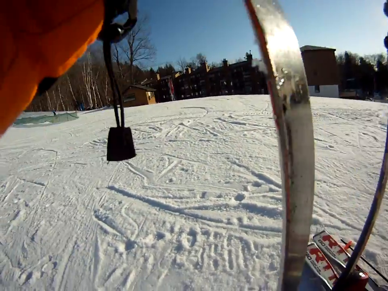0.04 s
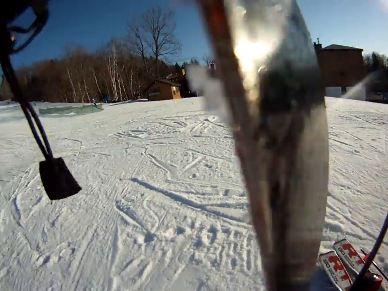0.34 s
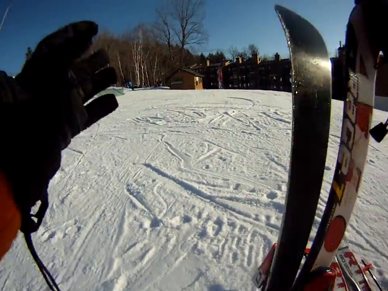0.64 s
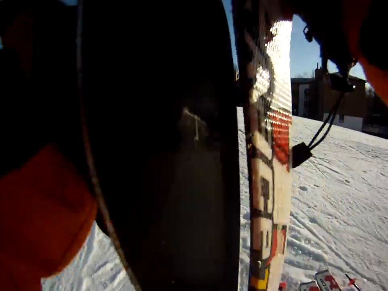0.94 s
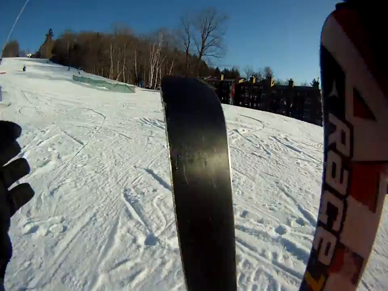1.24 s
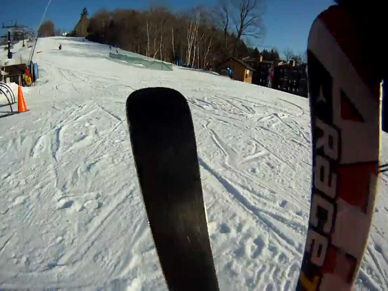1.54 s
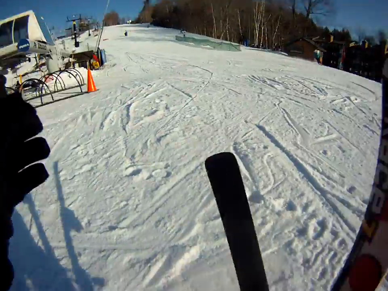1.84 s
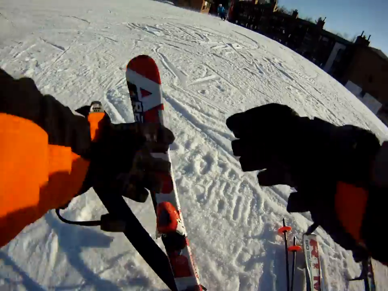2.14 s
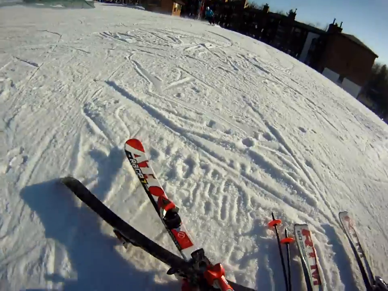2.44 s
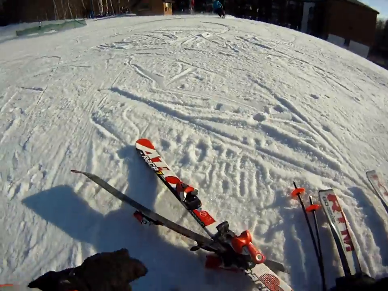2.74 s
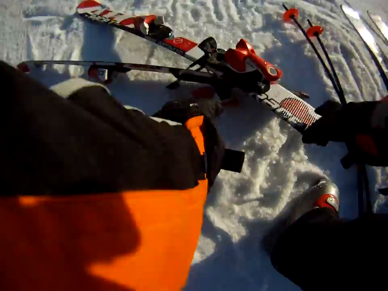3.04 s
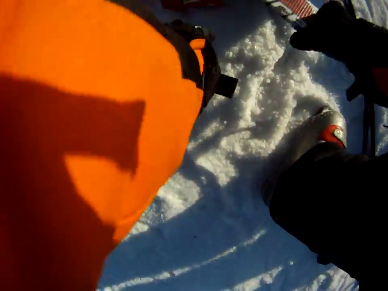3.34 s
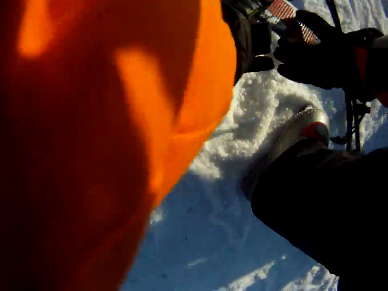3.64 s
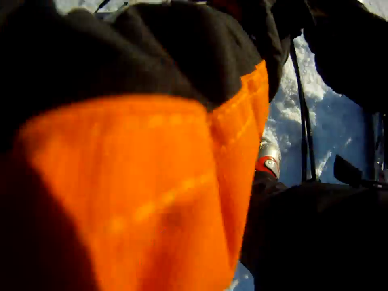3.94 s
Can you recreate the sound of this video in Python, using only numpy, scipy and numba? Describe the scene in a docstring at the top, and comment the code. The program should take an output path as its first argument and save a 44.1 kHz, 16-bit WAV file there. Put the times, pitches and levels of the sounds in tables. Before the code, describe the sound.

Skis clack together sharply up close, with edge scrapes, jacket rustle and light wind.

```python
"""Skis knocked together.

Close to a body-worn microphone, two skis are pulled apart, knocked together and dropped.
Steel edges scrape, bindings rattle, a jacket rustles and crunches; light wind and a low
machine hum lie underneath. Each hard clack overloads the input: the gain ducks, then recovers."""
import sys
import numpy as np
from scipy import signal
from scipy.fft import rfft, irfft, next_fast_len
from scipy.io import wavfile
from scipy.ndimage import map_coordinates
from numba import njit

SR = 44100
rng = np.random.default_rng(int(sys.argv[2]) if len(sys.argv) > 2 else 0)


def pcm_store(signal):
    """Save signal as 16-bit PCM."""
    levels = np.round(np.clip(np.atleast_2d(signal), -1, 1) * 32767)
    wavfile.write(sys.argv[1], SR, levels.astype(np.int16).T)


N = 4 * SR

# nylon sleeve swishing past; jacket body crumpling (t/s, level/dB)
SLEEVE_LEVELS = [(0, -32), (.08, -33), (.13, -37), (.19, -39.5), (.36, -42.5), (.6, -34.5), (.73, -43),
                 (.83, -36), (.94, -41), (1.01, -33.5), (1.13, -31.5), (1.24, -33.5), (1.38, -44.5),
                 (1.47, -30.5), (1.74, -42), (1.9, -40), (2.4, -53), (4, -40.5)]
CRUMPLE_LEVELS = [(0, -45), (.55, -37.5), (.75, -44), (.95, -32), (1.02, -40), (1.15, -33), (1.3, -45),
                  (1.4, -41), (1.55, -34.5), (1.72, -36), (1.84, -32.5), (1.97, -26.5), (2.1, -35),
                  (2.42, -36.5), (2.77, -36.5), (2.89, -28), (3.08, -24.5), (3.29, -40), (3.5, -33),
                  (3.72, -35.5), (3.88, -31.5), (4, -33.5)]
# low noise on the case (t/s, wind/dB, mount rub/dB)
RUMBLE_LEVELS = [(0, -34.5, -33), (.3, -30, -32.5), (.55, -35.5, -31), (.78, -34, -31.5),
                 (.97, -27.5, -31.5), (1.1, -32.5, -31), (1.35, -31.5, -32.5), (1.7, -30.5, -30),
                 (2, -32, -30), (2.4, -34, -36), (2.75, -32, -31), (3.12, -25, -30.5), (3.4, -31, -27),
                 (3.58, -31.5, -31), (3.72, -30.5, -27.5), (4, -28, -32.5)]
# machine hum (t/s, fundamental/dB, third harmonic/dB)
HUM_LEVELS = [(0, -31, -34), (.3, -34.5, -31.5), (.8, -34, -32.5), (1.3, -31.5, -37), (1.9, -37, -34),
              (2.4, -32, -32), (2.7, -27, -30.5), (3, -27.5, -29.5), (3.3, -35.5, -29), (3.55, -55, -29.5),
              (3.8, -31.5, -28.5), (4, -35, -29)]
# edge sliding on edge (t/s, length/s, level/dB, squeal over hiss/dB)
EDGE_STROKES = [(0.2, 0.08, -31.5, -3), (0.287, 0.025, -25, -5), (0.4, 0.04, -30.5, -13),
                (0.463, .018, -27.5, -6), (0.486, 0.013, -19, 7), (.5, 0.027, -23, 0),
                (0.537, 0.076, -31.5, -5), (0.828, 0.075, -32, -20), (0.922, 0.05, -27.5, -14),
                (1.051, .03, -29.5, -10), (1.311, 0.0036, -25.5, 6), (1.318, .008, -12.5, 6),
                (1.36, 0.039, -31, -3), (1.543, 0.013, -33.5, -2), (1.563, 0.019, -18.5, -9),
                (1.589, 0.012, -13, -5), (1.634, .012, -18, -14), (1.646, 0.022, -17, -24)]
# resonances of a sliding edge (f/Hz, width/Hz, level/dB)
SQUEAL_MODES = [(3100, 230, -1.5), (3540, 180, 1), (4880, 200, 2.5), (6970, 320, -4), (8700, 83, -7.5)]
# taps and rattles (t/s, level/dB, t60/s, hardness: 0 plastic binding to 1 steel edge)
TAP_HITS = [(.211, -17.5, 0.011, .9), (.217, -15.5, 0.011, 1), (.227, -21, .02, 0.82),
            (.237, -15.5, 0.015, 0.96), (0.255, -14.5, 0.0088, 0.96), (0.416, -17, 0.045, 0.84),
            (0.428, -10.5, 0.021, 0.95), (0.486, -17, 0.038, 1), (.576, -20.5, 0.054, .4),
            (0.595, -16, 0.017, 0.98), (0.94, -14, 0.02, 0.35), (0.973, -14, 0.022, 1),
            (1.049, -10.5, 0.02, 0.76), (1.130, -18, 0.12, 0.92), (1.216, -8, .03, 0.91),
            (1.389, -20, .03, .8), (1.513, -19.5, 0.013, 1), (1.695, -17, 0.022, 0.21),
            (1.998, -8.5, 0.03, 0.17), (2.004, -37, 0.028, .1), (2.053, -16, 0.07, 0.34),
            (2.178, -13.5, 0.051, 0.13), (2.193, -10, 0.061, 0.061), (2.203, -15, 0.026, 0.13),
            (2.220, -6.5, 0.038, 0.55), (2.279, -12.5, 0.12, 0.23), (2.287, -6.5, 0.042, 0.18),
            (2.296, -13, .025, 0.1), (2.323, -10.5, 0.041, 0.058), (2.375, -20.5, .03, 0.27),
            (2.502, -14, 0.039, 0.35), (2.518, -12, 0.035, 0.76), (2.525, -16.5, 0.038, 0.39),
            (2.566, -18.5, 0.024, 0.26), (2.834, -19, .03, .3), (3.403, -22.5, 0.016, 0.17),
            (3.635, -21.5, 0.033, .05), (3.779, -22, 0.02, .1)]
# bumps of gloves, skis and boots (t/s, level/dB, t60/s, f/Hz)
THUD_HITS = [(.295, -16.5, 0.07, 104), (0.347, -18, 0.041, 477), (.945, -24, 0.072, 270),
             (.966, -17, 0.084, 144), (1.010, -16, 0.06, 440), (1.563, -21, 0.029, 480),
             (1.916, -18, 0.042, 584), (1.997, -11, 0.059, 283), (2.000, -13.5, 0.066, 513),
             (2.184, -16.5, 0.14, 416), (2.196, -15, 0.074, 722), (2.226, -15.5, 0.21, 422),
             (2.527, -13.5, 0.064, 407), (3.118, -11, 0.081, 410), (3.347, -16, 0.087, 476),
             (3.403, -13, 0.037, 438)]
# ski on ski (t/s, level/dB, contact/s, pitch ratio, flex mode boost/dB)
CLACK_HITS = [(1.1535, 13.5, 0.0046, 1, -3), (1.425, 11, 0.0049, .96, -3), (1.7728, 10.5, 0.0041, 1.04, 8),
              (2.0256, 11, 0.0033, 0.98, -2.5), (2.2385, 9.5, 0.0018, 1.0, -2),
              (2.2442, 14, 0.0026, .99, -10)]
# ringing of a ski (f/Hz, level/dB, t60/s)
RING_MODES = [(607, -18, 0.016), (847, -18.5, 0.014), (1158, -10.5, 0.019), (1748, -14, 0.018),
              (2133, -9, 0.019), (2426, -4.5, 0.021), (2781, 0, 0.017), (3153, -10, .014),
              (3863, -11, 0.014), (4383, -12.5, 0.011), (5053, -14.5, 0.0073), (7330, -19, 0.0079),
              (8510, -17.5, 0.0096), (9210, -10, 0.017), (14470, -12.5, .012)]
# jacket fabric crunching (t/s, width/s, level/dB)
JACKET_SWELLS = [(2.835, 0.009, -24.5), (2.95, 0.04, -38), (3.065, 0.017, -27.5), (3.204, 0.024, -30.5)]

# source spectra (f/Hz, relative level/dB)
SLEEVE_SPECTRUM = [(600, -22), (1400, -12.5), (2100, 0.5), (2650, 4.5), (3250, -1), (3650, 0.5),
                   (4300, -6.5), (5100, -9), (7000, -14), (8300, -7.5), (9500, -8.5), (10800, -19),
                   (13000, -16), (14700, -8), (15800, -23)]
CRUMPLE_SPECTRUM = [(380, -15), (650, -5), (950, -4), (1270, -1.5), (1650, -5), (2100, 0), (2600, -0.5),
                    (3050, -2), (3350, -11), (3800, -5.5), (5000, -13.5), (7000, -16), (8300, -14),
                    (8700, -16), (9400, -11.5), (11000, -10.5), (13000, -10.5), (14700, -11.5),
                    (15800, -45)]
WIND_SPECTRUM = [(12, -35), (22, -6), (32, -4.5), (50, 1.5), (90, -2), (150, 1.5), (230, -1), (330, -11.5),
                 (700, -39), (1500, -72)]
MOUNT_SPECTRUM = [(100, -19), (220, -12), (300, -0.5), (440, 1.5), (560, -1.5), (680, -10), (850, -19.5),
                  (1200, -23.5), (2500, -44), (5000, -80)]
HISS_SPECTRUM = [(700, -2), (2500, -3), (5000, -25), (9300, -18), (11000, 4), (11700, 24), (12400, 20),
                 (13100, -8), (14800, -8), (16000, -16)]
STEEL_SPECTRUM = [(500, -42), (1000, -23.5), (1650, -2), (1900, -11.5), (2400, 2.5), (3000, 2.5),
                  (4200, -1), (5100, -4), (7000, -8), (9000, -5), (10200, -16.5), (11200, -31),
                  (13200, -22), (14700, -7), (15800, -2.5)]
PLASTIC_SPECTRUM = [(350, 0), (650, -2), (950, -8.5), (1350, -2), (2000, -1.5), (2800, -0.5), (4000, -28.5),
                    (5000, -23), (7500, -40.5), (9500, -11), (11000, -12), (13000, -16), (14600, -13.5),
                    (15800, -32)]
THUD_SPECTRUM = [(40, -19), (130, 3.5), (270, -13), (430, 6.5), (600, -1), (900, -17), (1400, -13),
                 (2500, -26)]
# case notch at 6 kHz; top-octave colour of the electronics (f/Hz, gain/dB)
CASE_RESPONSE = [(5150, 0), (5600, -7), (6000, -15), (6500, -5.5), (6900, 0.5)]
TREBLE_RESPONSE = [(9600, 0), (10800, -11), (12000, -15), (13200, -10), (14200, -7.5), (14900, 2),
                   (15500, -19)]


def amp(db):
    """Decibels to gain."""
    return 10 ** (np.asarray(db) / 20)


def unit(x):
    """Scale to rms 1."""
    return x / np.sqrt(np.mean(x ** 2) + 1e-20)


def clock(n=N):
    """Sample times in s."""
    return np.arange(n) / SR


def curves(rows):
    """Each column after the time, interpolated per sample."""
    times_s, *columns = np.transpose(rows)
    return [np.interp(clock(), times_s, column) for column in columns]


def wobble(rate_hz):
    """Smooth random curve through unit-variance knots."""
    knots = rng.standard_normal(int(N * rate_hz / SR) + 4)
    return map_coordinates(knots, [clock() * rate_hz])


def filtered(x, response):
    """Apply a gain given as a function of f/Hz."""
    size = next_fast_len(N + SR // 4)
    return irfft(rfft(x, size) * response(np.fft.rfftfreq(size, 1 / SR)), size)[:N]


def shaped(x, points):
    """Apply (f/Hz, gain/dB) points, joined over log frequency."""
    points_hz, db = np.transpose(points)
    return filtered(x, lambda hz: amp(np.interp(np.log(hz + 1), np.log(points_hz + 1), db)))


def coloured(x, spectrum):
    """Shape x, then scale to rms 1."""
    return unit(shaped(x, spectrum))


def noise(spectrum):
    """Coloured noise, rms 1."""
    return coloured(rng.standard_normal(N), spectrum)


def slips(rate_hz, spread_db, smooth_db):
    """Uneven stick-slip impulses over smooth friction noise."""
    hits = rng.random(N) < rate_hz / SR
    sizes = rng.choice([-1, 1], N) * amp(spread_db * np.clip(rng.standard_normal(N), -2, 2))
    return unit(hits * sizes) + amp(smooth_db) * rng.standard_normal(N)


def strike(t, rise_s, hold_s, t60_s):
    """Envelope: rise, hold during contact, decay."""
    t = np.maximum(t, 0)
    decay_db = -60 * np.clip(t - hold_s, 0, 2 * t60_s) / t60_s
    return (1 - np.exp(-t / rise_s)) * amp(decay_db)


def fabric(levels, spectrum):
    """Stiff jacket fabric crinkles as the skier moves; folds snap at random."""
    t = clock(SR // 50)
    level_db, = curves(levels)
    crinkle = unit(slips(rate_hz=700, spread_db=5, smooth_db=2) * amp(1.2 * wobble(170)))
    snap = rng.standard_normal(len(t)) * strike(t, rise_s=0.00026, hold_s=0, t60_s=0.017)
    buckles = slips(rate_hz=45, spread_db=1.5, smooth_db=-40)
    folds = unit(signal.fftconvolve(buckles, snap)[:N])
    return amp(level_db + wobble(35)) * coloured(crinkle + amp(-11) * folds, spectrum)


def rumble():
    """Uneven wind on the case and muffled rubbing of its mount."""
    wind_db, rub_db = curves(RUMBLE_LEVELS)
    wind = amp(wind_db + 1.6 * wobble(21.77)) * noise(WIND_SPECTRUM)
    rub = amp(rub_db + 1.8 * wobble(30)) * noise(MOUNT_SPECTRUM)
    return wind + rub


def hiss(level_db=-43.5):
    """Faint steady hiss, strongest near 12 kHz."""
    return amp(level_db) * noise(HISS_SPECTRUM)


def hum(pitch_hz=61.04, waver=0.0187):
    """Wavering machine hum: fundamental and third harmonic."""
    fundamental_db, third_db = curves(HUM_LEVELS)
    phase = 2 * np.pi * np.cumsum(pitch_hz * (1 + waver * wobble(13))) / SR
    fundamental = amp(fundamental_db + 1.5 * wobble(12)) * np.sin(phase)
    third = amp(third_db + 1.8 * wobble(15)) * np.sin(3 * phase)
    return np.sqrt(2) * (fundamental + third)


def edge_response(hz):
    """Steel edge resonances as parallel band-passes."""
    return sum(amp(db) * 1j * hz * width_hz / (mode_hz ** 2 - hz ** 2 + 1j * hz * width_hz)
               for mode_hz, width_hz, db in SQUEAL_MODES)


def scrapes(rise_s=0.0025, fall_s=0.0029):
    """Steel edges chatter along each other and squeal at their resonances."""
    out, t = np.zeros(N), clock()
    chatter = slips(rate_hz=1900, spread_db=4, smooth_db=-4.5) * amp(3.5 * wobble(300))
    edge_hiss = coloured(chatter, STEEL_SPECTRUM)
    squeal = unit(filtered(chatter, edge_response))
    for start_s, length_s, db, squeal_db in EDGE_STROKES:
        age_s = t - start_s
        stroke = np.exp(np.minimum(age_s, 0) / rise_s - np.maximum(age_s - length_s, 0) / fall_s)
        blend = (edge_hiss + amp(squeal_db) * squeal) / np.hypot(1, amp(squeal_db))
        out += amp(db) * stroke * blend
    return out


def taps():
    """Light contacts: noise bursts between dull plastic and bright steel."""
    out, t = np.zeros(N), clock(SR // 8)
    steel, plastic = noise(STEEL_SPECTRUM), noise(PLASTIC_SPECTRUM)
    for start_s, db, t60_s, hardness in TAP_HITS:
        span = round(start_s * SR) + np.arange(len(t))
        blend = np.sqrt(hardness) * steel[span] + np.sqrt(1 - hardness) * plastic[span]
        out[span] += amp(db) * strike(t, rise_s=0.0002, hold_s=0.0015, t60_s=t60_s) * blend
    return out


def thuds(tone_db=-1, puff_db=-7.5):
    """Soft, heavy contacts: a damped low tone in a puff of noise."""
    out, t = np.zeros(N), clock()
    puff = amp(puff_db) * noise(THUD_SPECTRUM)
    for start_s, db, t60_s, hz in THUD_HITS:
        age_s = t - start_s
        tone = amp(tone_db) * np.sin(2 * np.pi * hz * age_s)
        out += amp(db) * strike(age_s, rise_s=0.0017, hold_s=0.0043, t60_s=t60_s) * (tone + puff)
    return out


def clacks(rise_s=0.00044, crack_db=-4.5, flex_below_hz=1600):
    """The skis slap together along their length for a few ms and ring briefly."""
    out, t = np.zeros(N), clock(SR // 8)
    crack = amp(crack_db) * noise(STEEL_SPECTRUM)
    for start_s, db, contact_s, pitch_ratio, flex_db in CLACK_HITS:
        span = round(start_s * SR) + np.arange(len(t))
        blow = crack[span] * strike(t, rise_s, contact_s, t60_s=0.017)
        for hz, mode_db, t60_s in RING_MODES:
            gain = amp(mode_db + flex_db * (hz < flex_below_hz) + rng.normal(0, 1))
            ring = np.sin(2 * np.pi * (hz * pitch_ratio * t + rng.random()))
            blow += gain * ring * strike(t, rise_s, contact_s, t60_s)
        out[span] += amp(db) * blow
    return out


def jacket_crunches():
    """Jacket fabric crunches in short grainy swells as the arm moves."""
    swells = sum(amp(db) * np.exp(-0.5 * ((clock() - peak_s) / width_s) ** 2)
                 for peak_s, width_s, db in JACKET_SWELLS)
    grains = slips(rate_hz=610, spread_db=0.5, smooth_db=-1)
    return swells * coloured(grains, CRUMPLE_SPECTRUM)


def scene():
    """All sources reach one microphone through its case."""
    contacts = clacks() + taps() + scrapes() + thuds()
    jacket = jacket_crunches() + fabric(SLEEVE_LEVELS, SLEEVE_SPECTRUM)
    jacket += fabric(CRUMPLE_LEVELS, CRUMPLE_SPECTRUM)
    return shaped(contacts + jacket + rumble() + hiss() + hum(), CASE_RESPONSE)[None]


@njit
def duck_db(x, threshold_db, depth_db, attack_db_per_s, release_db_per_s, detector_s):
    """Gain falls fast while the output peak is over threshold, then creeps back."""
    threshold, fade = 10 ** (threshold_db / 20), np.exp(-1 / (detector_s * SR))
    gain_db, cut_db, peak = np.zeros(len(x)), 0.0, 0.0
    for i in range(len(x)):
        sensed = min(abs(x[i]) * 10 ** (-cut_db / 20), 2.0)
        peak = max(peak * fade, sensed)
        if peak > threshold:
            cut_db = min(cut_db + attack_db_per_s / SR, depth_db)
        else:
            cut_db = max(cut_db - release_db_per_s / SR, 0.0)
        gain_db[i] = -cut_db
    return gain_db


def record(dry):
    """Gain control, soft clip at full scale, treble colour, band limit."""
    knee, top_hz = 4.6, 15600
    gain_db = duck_db(dry[0], threshold_db=1, depth_db=22.0,
                      attack_db_per_s=2404, release_db_per_s=153, detector_s=0.0068)
    ducked = dry[0] * amp(gain_db)
    clipped = ducked / (1 + np.abs(ducked) ** knee) ** (1 / knee)
    return filtered(shaped(clipped, TREBLE_RESPONSE), lambda hz: hz < top_hz)[None]


dry = scene()
out = record(dry)
pcm_store(out)
```